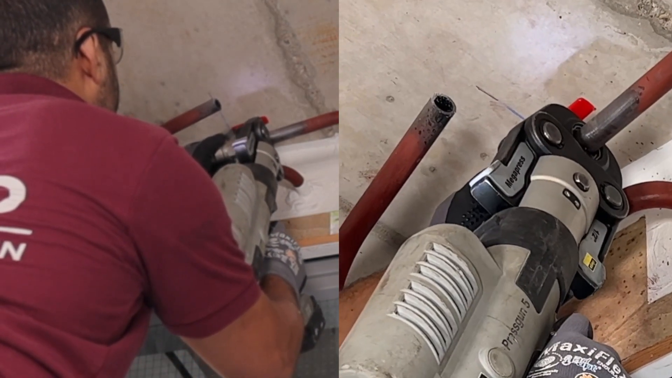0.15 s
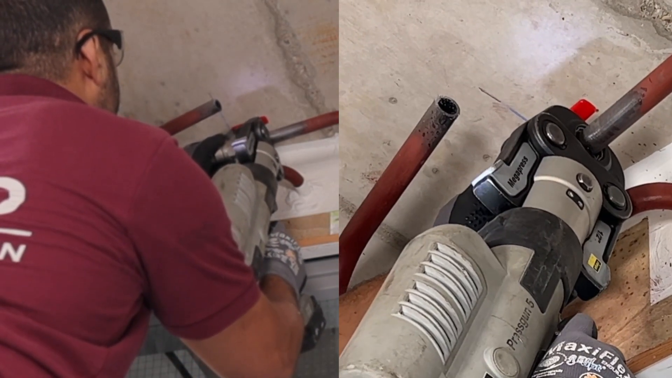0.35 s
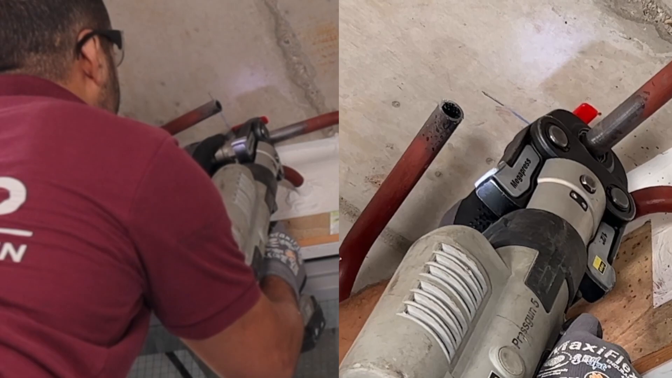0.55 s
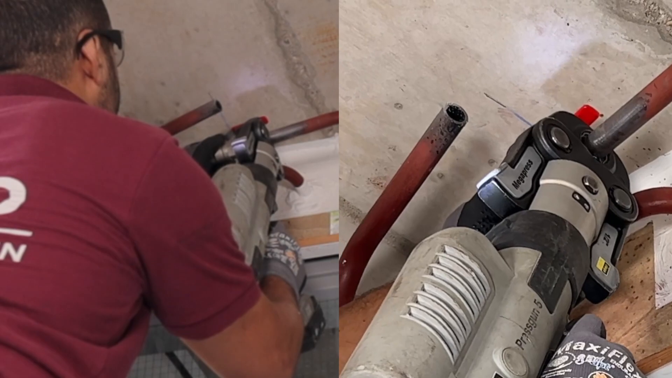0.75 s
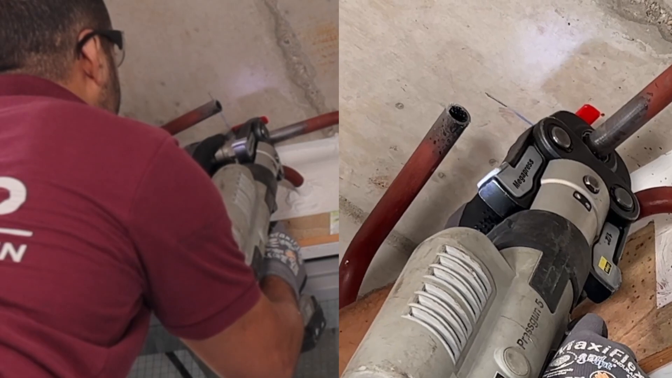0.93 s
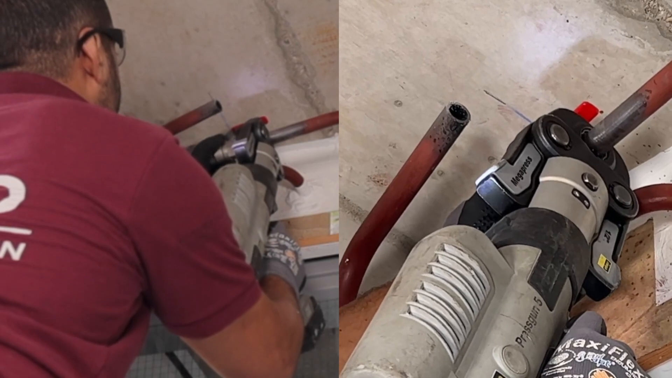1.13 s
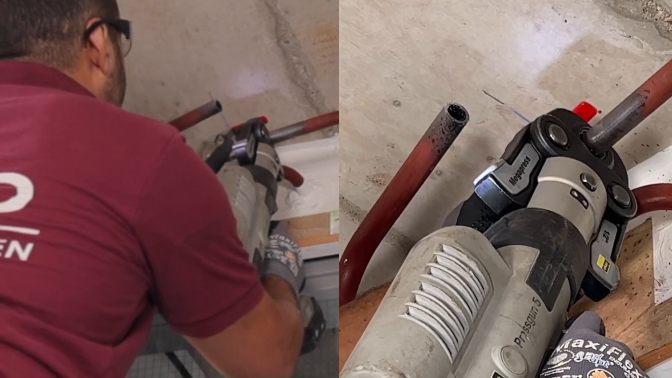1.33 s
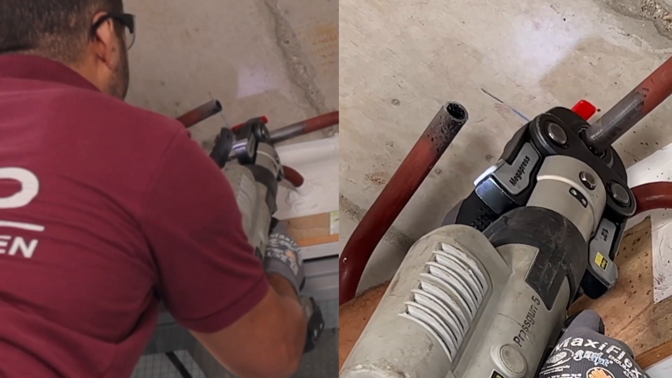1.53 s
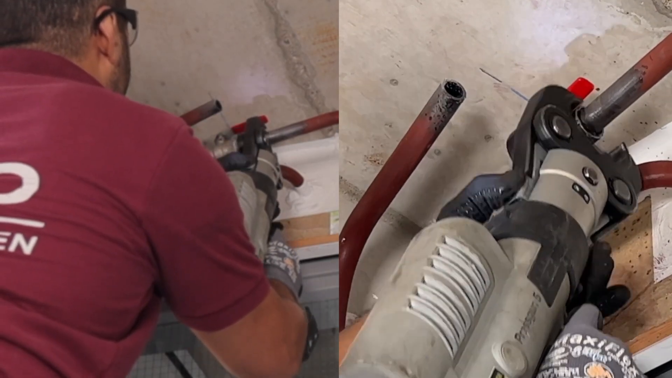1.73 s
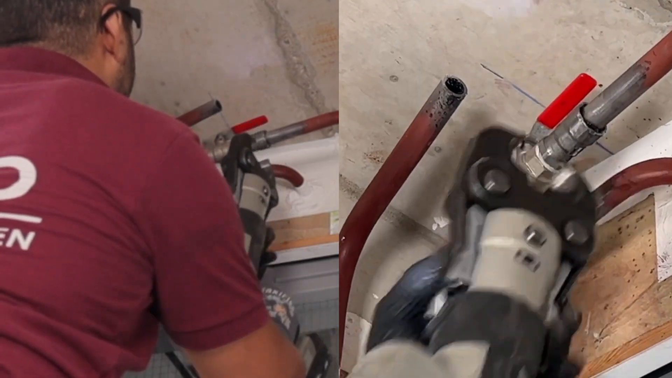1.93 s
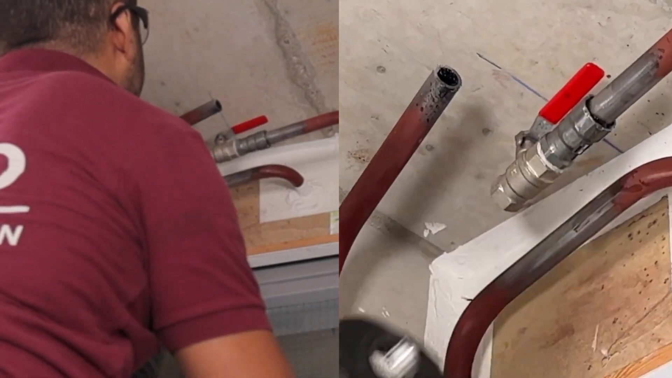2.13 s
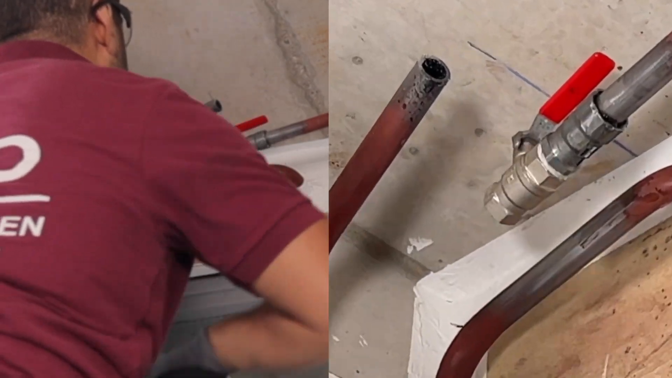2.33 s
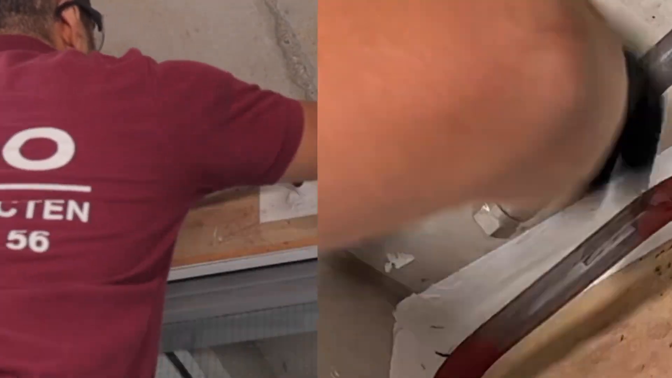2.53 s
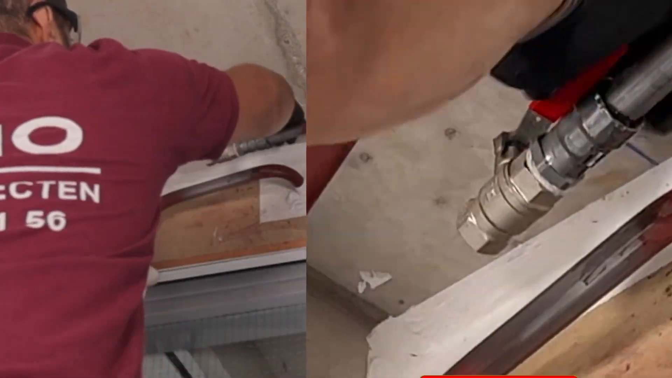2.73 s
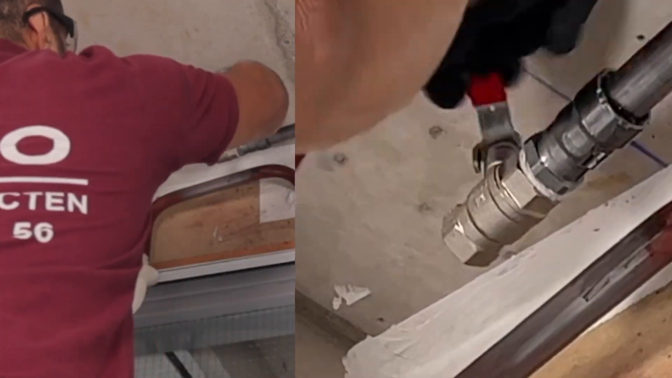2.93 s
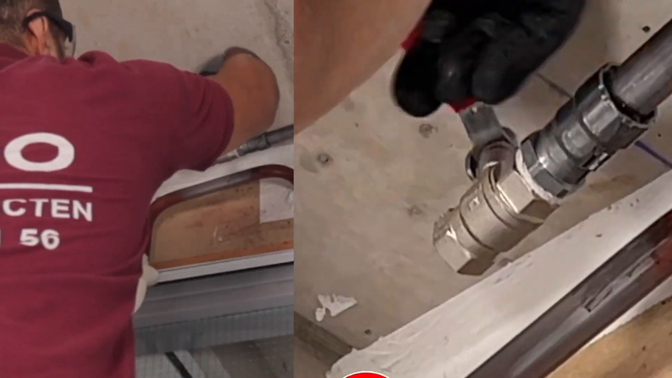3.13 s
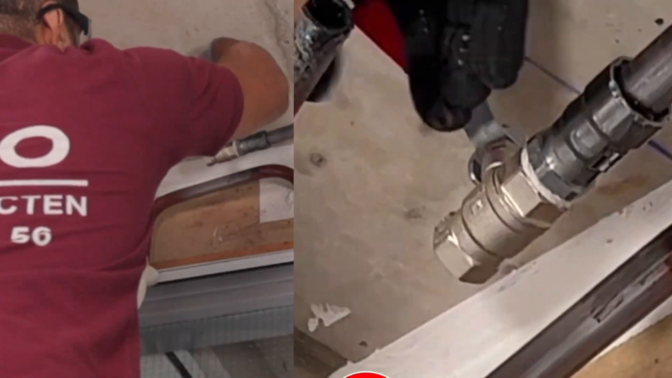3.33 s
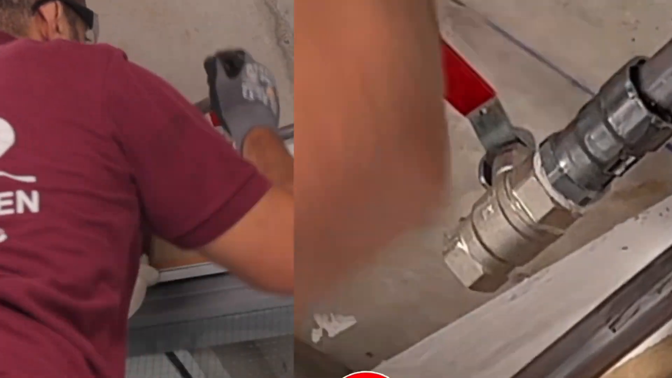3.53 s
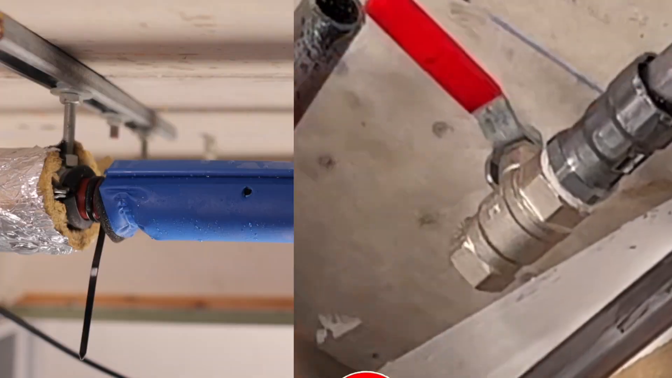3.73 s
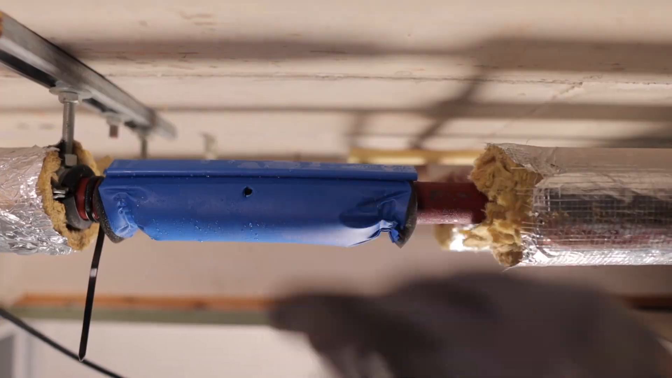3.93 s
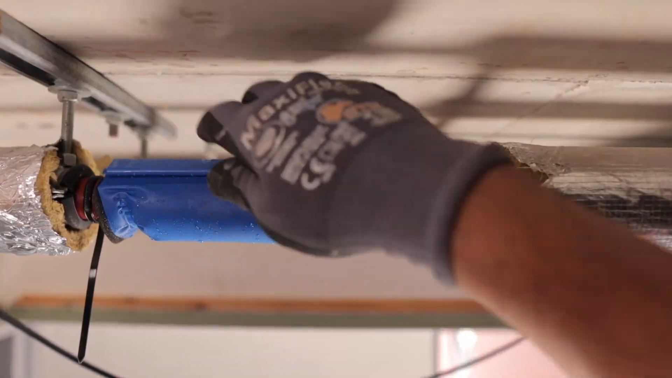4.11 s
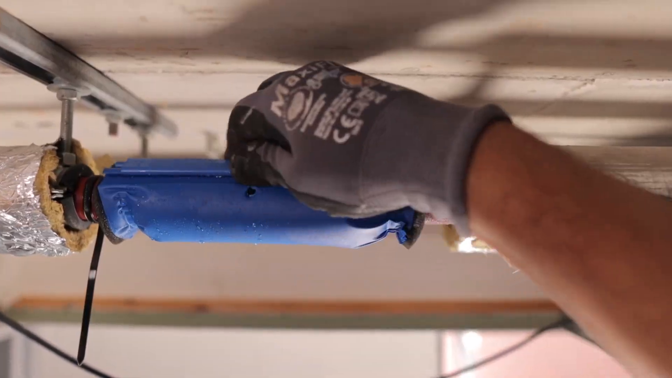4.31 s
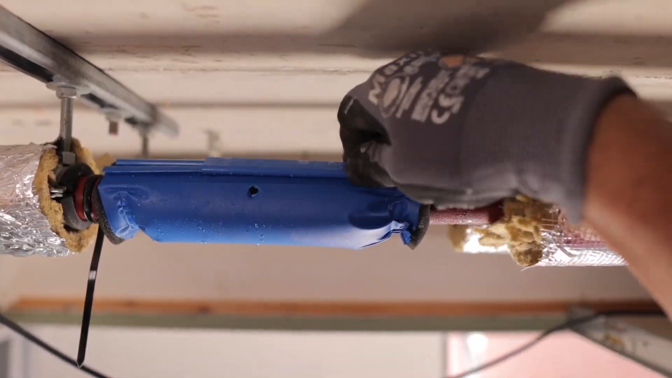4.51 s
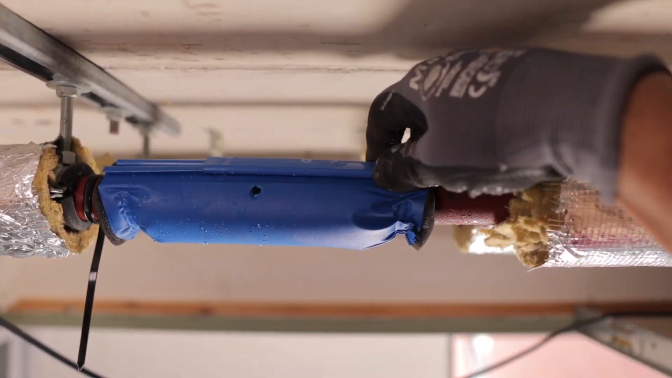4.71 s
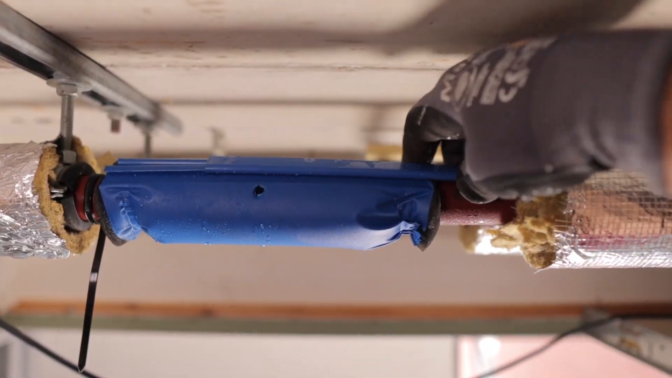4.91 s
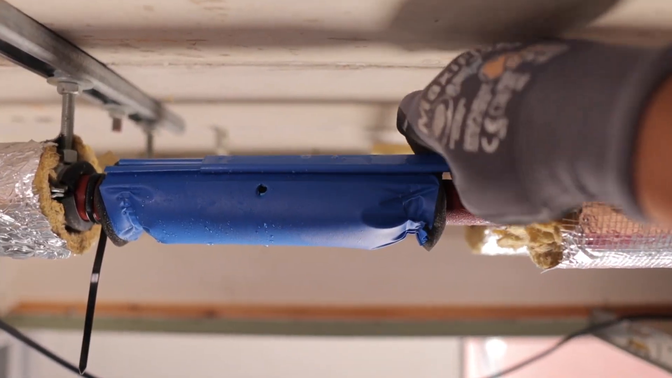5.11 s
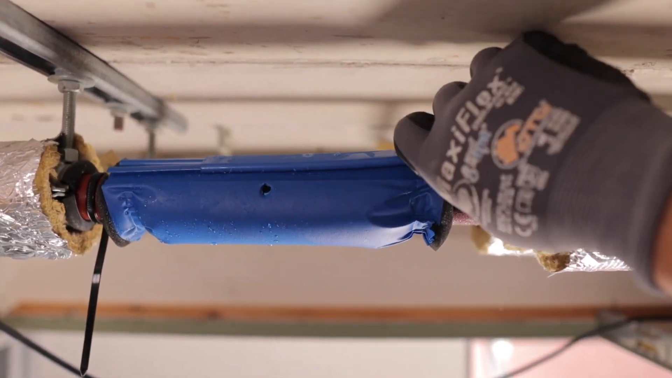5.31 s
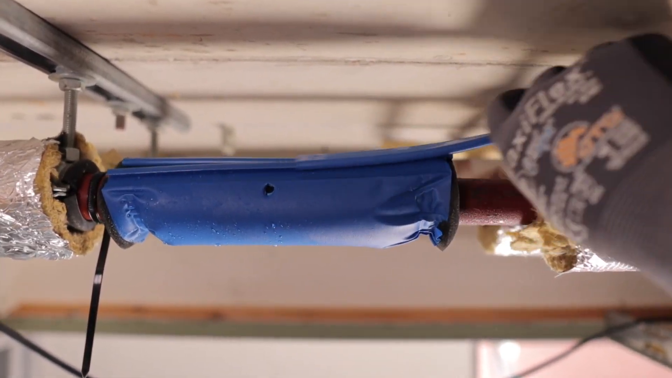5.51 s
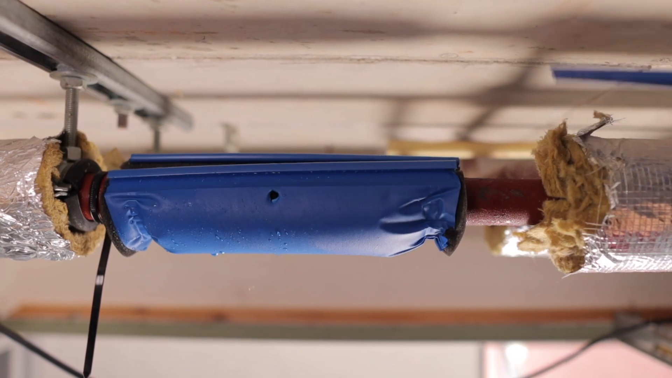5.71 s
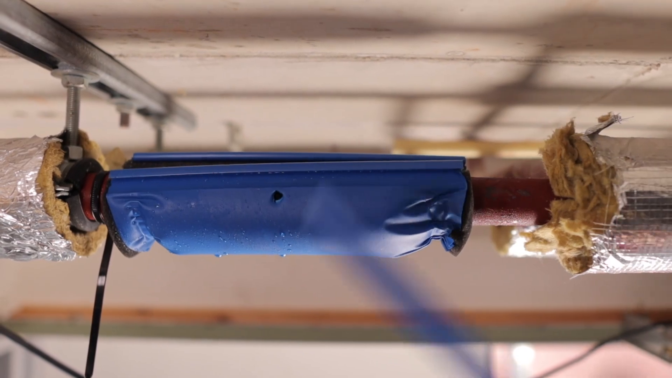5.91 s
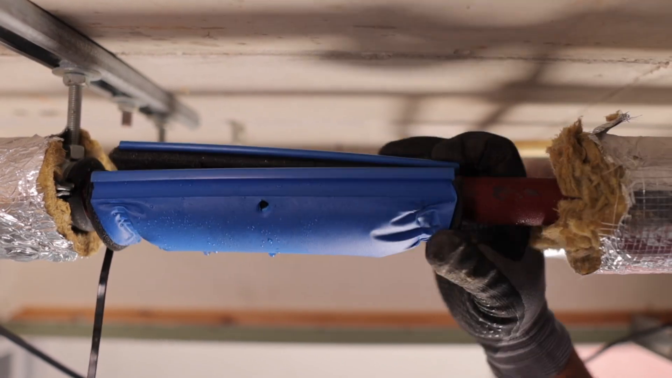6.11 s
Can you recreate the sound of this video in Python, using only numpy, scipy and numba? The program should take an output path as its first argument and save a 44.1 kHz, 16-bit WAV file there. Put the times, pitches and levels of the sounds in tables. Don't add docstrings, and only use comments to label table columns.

```python
import sys
import numpy as np
from scipy import signal
from scipy.fft import rfft, irfft
from scipy.io import wavfile
from scipy.ndimage import uniform_filter1d
from numba import njit

SR = 44100
rng = np.random.default_rng(int(sys.argv[2]) if len(sys.argv) > 2 else 0)


def undo_db(level):
    steps = np.asarray(level, float) / 20
    return 10 ** steps


def int16_out(signal):
    q = np.round(np.clip(np.atleast_2d(signal).T, -1, 1) * 32767)
    wavfile.write(sys.argv[1], SR, q.astype(np.int16))


N = 271656

# t/s, stroke f/Hz
CRIMP = [(0.0, 62.8), (0.192, 64.09), (0.34, 64.1), (0.46, 62.64), (0.59, 62.12), (0.762, 58.72),
         (0.908, 55.2), (0.976, 52.88), (1.019, 52.0)]
# multiple, level/dB
STROKE = [(1, -19.5), (2, -24.5), (3, -25), (4, -20), (5, -10.5), (6, -13)]
# multiple, level/dB
STEADY = [(9, -15), (10, -17), (12, -11.5), (15, -12), (16, -12.5), (17, -9.5), (29, -15), (31, -12),
          (35, -16), (40, -16), (41, -11.5), (91, -22)]
# multiple, level/dB
ODD = [(40, 5), (41, 2.5), (15, 8.5), (17, -0.5), (18, -2), (19, -6.5), (23, 6), (25, 7.5), (26, -1.5),
       (27, 3.5), (28, 4), (29, 1.5), (11, -6), (7, -2), (24, -3.5), (32, 4.5), (35, 3), (30, -9.5),
       (31, 11)]
# multiple of the stroke, level/dB
MESH = [(89.9, -5.5)]
# f/Hz, width/Hz, level/dB
HOUSING = [(764, 18, -8), (1076, 60, 1.5), (1960, 130, -3.5), (2178, 11, 3.5), (2590, 90, -7.5),
           (2930, 170, -8), (3500, 89, -12), (440, 37, -11), (1500, 160, -9.5), (4350, 37, -10.5),
           (5220, 300, -6.5)]
# f/Hz, level/dB per Hz
TOOL = [(88, -64.5), (150, -27), (303, -7), (745, 6), (871, -12), (1060, -6.5), (1260, -7.5), (2020, -7),
        (4670, -6), (5680, -8), (6140, -4), (12400, -16), (16000, -35.5)]
# t/s, f/Hz, level/dB, length/s
DUMP = [
    (1.0192, 430, -6, .0085),
    (1.0200, 1350, -9, .0055),
    (1.0185, 200, -24, .011),
]
# t/s, peak level/dB, low ring level/dB, high ring level/dB, free ringing/s
JAWS = [
    (1.8620, -9, -45, -45, .004),
    (1.8632, -1, -45, -16, .006),
    (2.1098, -5, -12, 1, .0093),
    (2.1160, -20, -3, 3, .011),
    (2.1300, -8, 1, -11, .0075),
    (2.1302, -30, 14, 2, .019),
    (2.1398, -11, -6, -6, .004),
    (2.1452, -12, -7, -10, .004),
    (2.1490, -17, -18, -12, .004),
]
# f/Hz, width/Hz, level/dB
JAW_MODES = [(716, 230, -4.5), (1700, 1500, 2), (2240, 390, -10), (3570, 590, 1), (4500, 600, -8.5),
             (6100, 670, 0), (10940, 600, -15.5), (12600, 1800, -11.5)]
# f/Hz, t60/s
FREE_RINGS = [(8220, .2), (13870, .15)]
# f/Hz, level/dB, t60/s
GRIP_RINGS = [(3370, -13.5, .85), (4430, -10.5, .5), (4470, -12.5, .5), (5335, -15, .46), (6196, -7.5, .4),
              (6460, -7.5, .4), (6800, -10, .45), (8140, -3.5, .5), (8330, -3.5, 0.6), (12670, -17, .35),
              (13790, -6, .35), (13900, -4, .3), (14010, -7, .35), (1100, -10, .4), (2300, -9.5, .4)]
# f/Hz, width/Hz, level/dB
SHIVER = [(5950, 300, 0), (7040, 300, -1), (8830, 120, -9), (12600, 420, -7), (13800, 260, -7)]
# t/s, peak
# level/dB, body f/Hz, treble level/dB, t60/s
THUMPS = [(1.8632, 1, 6310, -38.5, 0.022), (1.8622, -6.5, 727, -40.5, 0.044),
          (1.8645, -7.5, 1900, -30, 0.013), (1.8858, -26, 1500, -16, .015), (1.8975, -26.5, 1204, -12, .02),
          (1.8990, -19, 656, -19.5, 0.033), (2.1310, -5, 6640, -39.5, 0.035),
          (2.1098, -5.5, 1500, -12, 0.017), (2.11, -7, 3300, -30, .018), (2.1102, -16, 750, -30, .013),
          (2.113, -18.5, 1400, -40, .06), (2.1302, -5.5, 1500, -20, .013), (3.034, -39.5, 855, -4, .03),
          (3.463, -31, 135, -59, .14), (3.049, -35, 2150, -13.5, .035)]
# t/s, peak level/dB, body f/Hz, treble level/dB
KNOCKS = [(1.314, -35, 676, -24), (1.4885, -32.5, 1370, 0), (1.4895, -35.5, 5230, -18),
          (1.637, -40, 730, -27.5), (1.734, -44.5, 630, -5), (1.812, -35.5, 1200, -11),
          (1.8195, -23.5, 700, -10), (1.821, -39.5, 1500, 13), (2.339, -35, 834, -8),
          (2.364, -32.5, 700, -18), (2.469, -29, 720, -14.5), (2.472, -34, 450, -40),
          (2.793, -53, 650, 10.5), (3.337, -44, 463, -25.5), (2.089, -34.5, 900, -39.5),
          (3.800, -44, 426, -2)]
# t/s, peak level/dB
SLIPS = [(3.4324, -14), (3.4429, -20), (3.4462, -15), (3.4572, -13.5), (3.4655, -22), (3.471, -21),
         (3.4786, -15), (3.4863, -17), (3.437, -28.5), (3.494, -21), (3.689, -23), (3.705, -23)]
# f/Hz, width/Hz, level/dB
LEVER_MODES = [(133, 30, -7), (443, 60, -15), (396, 114, -12), (655, 80, -5), (745, 81, -6),
               (930, 87, -7.5), (1530, 170, -8.5), (1780, 89, -6.5), (2540, 80, -18), (2850, 70, -27),
               (3700, 60, -30), (4050, 90, -26)]
# t/s, f ratio
BEND = [
    (3.43, .97),
    (3.51, 1.04),
    (3.6, 1.0),
    (3.81, .92),
]
# peak
# t/s, rise/s, fall/s, rub level/dB, swish level/dB over the rub
MOVES = [(1.37, 0.13, 0.44, -44.5, -13), (1.869, 0.084, 0.15, -33, -20), (1.97, 0.084, 0.13, -60.5, 14),
         (2.18, 0.033, 0.4, -65, 27), (2.344, .12, 0.23, -47.5, -13.5), (2.75, 0.33, 0.14, -59, 0.5),
         (3.044, 0.028, 0.2, -39.5, -9), (3.1, 0.06, 0.21, -36, -18), (3.48, 0.026, 0.15, -29, -25),
         (3.62, 0.09, 0.19, -37, -15), (3.744, 0.5, 0.042, -34.5, -14), (3.28, 0.17, 0.15, -47.5, -10),
         (3.13, .08, 0.081, -52, -17)]
# f/Hz, level/dB per Hz
RUB = [(120, -22), (200, -6), (290, -1.5), (602, -2), (720, -3), (1220, -7), (1790, -8), (2300, -11.5),
       (3500, -22.5), (4550, -50), (7700, -120)]
# f/Hz, level/dB per Hz
SWISH = [(1180, -31), (2000, 1), (2530, 0.5), (3310, 3.5), (4990, 2), (13600, -12), (16000, -25)]
# peak t/s, rise/s, fall/s, level/dB
DRAG = [
    (3.10, 0.046, 0.19, -38.5),
    (3.17, 0.09, .2, -38),
    (3.225, 0.13, 0.043, -42.5),
    (3.33, 0.097, 0.18, -48.5),
]
# f/Hz, width/Hz, level/dB
BENCH_MODES = [(118, 30, 1), (205.2, 36, 2), (257.3, 32, -2), (323.7, 40, -4), (460, 40, -1.5),
               (721, 35, -5.5), (1040, 40, -10.5)]
# peak t/s, rise/s, fall/s, level/dB
THUDS = [
    (1.101, .05, 0.56, -48),
    (1.868, 0.14, 0.82, -46),
    (2.344, .3, 0.18, -57),
    (3.0, 0.35, 0.042, -55),
    (3.15, 0.19, 0.68, -42.5),
    (3.46, 0.13, .2, -53.5),
    (3.62, 0.36, 0.45, -48),
]
# f/Hz, level/dB per Hz
RUMBLE = [(12, -33.5), (20, -13.5), (60, 14.5), (96, 5.5), (128, 5), (166, -5.5), (198, -3), (255, -2.5),
          (289, -14.5), (400, -1.5), (520, -28.5), (880, -120)]
# t/s, peak level/dB, body f/Hz, treble level/dB, t60/s
SNAPS = [(3.825, -20, 2550, -10, 0.038), (3.915, -22.5, 3370, -18.5, 0.037),
         (4.241, -21, 3080, -22.5, 0.037), (4.403, -20.5, 2180, -11, 0.026),
         (4.4522, -19, 2490, -0.5, 0.022), (4.514, -32.5, 1345, -27, 0.049), (4.68, -36, 2410, 8.5, 0.05),
         (4.702, -37.5, 1240, -15.5, 0.0305), (4.783, -41.5, 1226, -21, 0.027),
         (4.831, -38, 2540, 2.5, 0.027), (4.8503, -38.5, 2060, 11.5, 0.028),
         (4.869, -37, 2050, -26, 0.0293), (4.961, -43.5, 1960, 1, 0.022), (5.1, -40.5, 1595, 4, 0.051),
         (5.1947, -24.5, 2320, 2.5, 0.034), (5.229, -37, 1380, -8, 0.022), (5.3214, -29, 5420, -4, 0.023),
         (5.349, -18.5, 1590, -0.5, 0.066), (5.7505, -22, 1684, -2, 0.033), (5.874, -27, 2140, -6, 0.013),
         (4.2362, -29, 4780, -1, 0.12), (5.1715, -31.5, 2310, -8, 0.16), (6.0235, -31, 3020, -10, 0.045)]
# t/s, peak level/dB, body f/Hz, treble level/dB, t60/s
SCUFFS = [(4.155, -29.5, 1175, -3.5, 0.12), (4.269, -32.5, 1760, 1, 0.13), (4.582, -35, 1460, -31, 0.037),
          (4.935, -38.5, 1320, -21, 0.13), (5.006, -34, 1460, -29, 0.09), (5.063, -36, 1143, -23.5, 0.037),
          (5.17, -30.5, 564, -4, 0.14), (5.324, -25.5, 630, -7.5, 0.15), (5.384, -39, 793, -17, 0.058),
          (5.591, -38.5, 1180, -16.5, 0.048), (5.834, -36.5, 593, -13, 0.0893),
          (6.025, -28, 1340, -1.5, 0.097)]
# t/s, peak level/dB, f/Hz, t60/s
PINGS = [(4.157, -33, 1156, 0.075), (4.2374, -21, 5090, 0.05), (4.238, -20.5, 3270, .025),
         (4.4032, -25.5, 2330, .015), (4.4525, -18, 2440, 0.01), (4.5157, -32.5, 1403, .04),
         (4.5828, -32, 1530, 0.032), (4.739, -45, 1060, 0.032), (4.8503, -26.5, 5640, 0.011),
         (4.9407, -40, 1500, .02), (4.9615, -38, 5760, .015), (5.0076, -42, 4900, .015),
         (5.028, -45, 3010, .01), (5.139, -47, 2500, .01), (5.1772, -34.5, 703, 0.024),
         (5.196, -21, 5760, 0.012), (5.197, -24, 7700, 0.014), (5.196, -26, 4500, .015),
         (5.322, -31, 3700, 0.023), (5.336, -33, 560, .03), (5.3500, -26, 637, 0.031),
         (5.3498, -30, 5140, .02), (5.386, -39, 900, 0.026), (5.425, -40, 650, 0.04),
         (5.593, -43, 1190, 0.054), (5.660, -34, 1080, .03), (5.7165, -33, 1780, .04),
         (5.728, -32, 4250, .015), (5.733, -32, 1740, 0.034), (5.742, -29, 2300, .02),
         (5.7522, -18.5, 1700, 0.027), (5.7518, -24.5, 580, 0.013), (5.780, -38, 1740, .04),
         (5.8457, -37, 3200, .015), (5.875, -24, 5800, 0.0063), (5.1962, -25, 13200, 0.014),
         (5.175, -32, 12300, 0.0089), (5.3235, -34, 13000, .012), (5.353, -31, 13080, .015),
         (6.024, -30, 11500, 0.013), (6.0083, -39, 1320, 0.043), (6.028, -30, 1215, 0.025),
         (6.125, -40.5, 1195, .03)]
# peak t/s, rise/s, fall/s, rub level/dB, crinkle level/dB over the rub
PULLS = [(3.939, 0.22, 0.037, -68.5, 9), (4.26, 0.036, 0.1, -52.5, 6), (4.2, 0.12, 0.28, -56, -10),
         (4.43, 0.25, 0.19, -48.5, -14), (4.6, 0.14, 0.073, -48, -11.5), (5.01, 0.23, 0.23, -54.5, -7.5),
         (5.369, 0.058, 0.11, -49.5, -12), (5.665, 0.036, 0.038, -46.5, -7),
         (5.747, 0.075, 0.042, -39.5, -6), (5.70, 0.22, 0.12, -45.5, -12.5),
         (5.85, 0.025, 0.063, -44.5, -3), (5.9, .08, 0.14, -56.5, -2), (6.041, 0.2, 0.18, -56.5, -10),
         (6.16, 0.18, .1, -53, -11)]
# f/Hz, level/dB per Hz
SLEEVE = [(120, -12), (200, -7.5), (616, 4.5), (747, 1.5), (1390, 0), (1730, -4), (2070, -5), (3500, -37),
          (4550, -35), (7700, -120)]
# f/Hz, level/dB per Hz
STRIP = [(1180, -4.5), (2000, -2.5), (2910, -4.5), (3460, -7.5), (4340, -9.5), (5160, -5), (8630, -17.5),
         (13700, -21), (14700, -32), (16000, -31)]
# t/s, f/Hz, width/Hz, level/dB, half length/s
SQUEAK = (5.95, 5800, 260, -54, .022)
# f/Hz, level/dB per Hz
QUIET = [(12, -39), (20, -14), (59, -4.5), (189, -16.5), (225, -21.5), (305, -23.5), (900, -35),
         (1170, -39), (1980, -120)]
# f/Hz, t60/s
ROOM_T60 = [(300, 0.74), (1200, 0.72), (4000, 0.98), (11000, 0.6)]

LAST_KNOCK_S, FREED_S, BRAKE_S, CUT_S = 1.0140, 1.024, 1.099, 3.808
FREE_HZ, BRAKE_HZ_PER_S, CRAWL_HZ = 65.4, 620, 31
LOADED_DB, STRAIN_DB, FREED_DB, FADE_DB_PER_S, FADE_LAG_S = -17.5, 2, -25.5, 480.5, 0.02
WHINE_DB, SINGS_HZ, SINGS_WIDTH_HZ, SINGS_DB = -12, 61.26, 3.7, 9.5
HISS_DB, FREED_HISS_DB = -18, -13.5
LOOSE_DB = 2
CREEP = 5
GRIP_S, GRIP_DB = 2.112, -33
OPENED_S, OPENED_DB, OPENED_T60_S = 1.866, -40, .55
CRACK_T60_S, KNOCK_T60_S = 0.027, 0.021
STILL_RUB_DB, STILL_SWISH_DB, STILL_RUMBLE_DB = -58, -71.5, -59
HELD_RUB_DB, HELD_CRINKLE_DB = -62.5, -75.5


def press():
    n = int(1.3 * SR)
    hz, db, whine_db, hiss_db = motor()
    hz = hz[:n]
    dumped = np.arange(n) >= DUMP[0][0] * SR
    pressure = np.clip((64.5 - hz) / 13.0, 0, 1) * ~dumped
    turn = np.cumsum(hz) / SR
    turn -= turn[int(LAST_KNOCK_S * SR)]
    phase = 2 * np.pi * turn
    pattern = 1 - 1.2 * np.maximum(pressure, dumped)

    loose = rng.standard_normal(n) * undo_db(1.4 * np.cos(2 * phase) + 1.1 * walk(150, n))
    drive = level(clatter(phase, pattern), 0) + level(loose, LOOSE_DB)
    body = drive + sum(3.7 * undo_db(d) * band(drive, f, 1.9 * w) for f, w, d in HOUSING)
    body = signal.lfilter(*signal.butter(2, 330, "high", fs=SR), colour(body, TOOL))
    body = level(body, 0) * undo_db(-7.0 * pressure * (turn % 1 + 0.06))
    shell = level(band(band(drive, 3700, 90), 3700, 130), -11) * np.exp(-((hz - 61.7) / 1.5) ** 2)

    strokes = sum(undo_db(d) * np.sin(k * phase + k * k) for k, d in STROKE)
    steady = pattern ** 2 * sum(undo_db(d + 2.0 * walk(14, n)) * np.sin(k * phase + 0.6 * walk(25, n))
                                for k, d in STEADY)
    wobble = 1 + .45 * np.sin(phase) + .2 * walk(60, n)
    whine = wobble * sum(undo_db(d) * np.sin(k * phase + (1.1 + 3.2 * pressure) * walk(140, n)) for k, d in MESH)

    click = np.diff(np.floor(turn), prepend=np.floor(turn[0]))
    burst = rng.standard_normal(n) * np.exp(-(turn % 1) / hz / 0.0075) + 6.8 * click
    knock = band(burst, 2800, 1600) + .4 * band(burst, 6000, 1500) + 0.3 * band(burst, 12500, 6000)
    rough = burst + .5 * loose
    grind = band(band(rough, 1700, 600), 1700, 900) + .8 * band(band(rough, 3100, 700), 3100, 1200)
    brushes = band(band(rng.standard_normal(n), 6300, 8300), 6600, 9800) * undo_db(0.5 * walk(200, n))

    mix = body + steady + shell
    mix += undo_db(-5) * pressure ** 2 * level(grind, 0)
    mix += undo_db(-10.5) * strokes + undo_db(whine_db[:n]) * whine
    mix += undo_db(-4.5) * piston_slap(turn)
    mix += undo_db(-27.5 + 13 * pressure) * level(knock, 0)
    mix += undo_db(hiss_db[:n] - 3.0) * level(brushes, 0)
    out = np.zeros(N)
    out[:n] = mix
    out *= undo_db(db)
    for s, f, d, length in DUMP:
        t = np.arange(int(length * SR)) / SR
        add(out, s, undo_db(d) * np.sin(2 * np.pi * f * t) * np.sin(np.pi * t / length) ** .5)
    return out


def clatter(phase, pattern):
    n = len(phase)
    creep = np.array([np.cumsum(walk(30, n)) / SR for _ in range(4)])
    patchy = np.gradient(creep, axis=1) * SR
    mixes = rng.standard_normal((110, 5))
    uneven_db = 3.2 * mixes[:, 0] * (np.arange(110) > 32)
    for k, d in ODD:
        uneven_db[round(k) - 1] = d
    out = np.zeros(n)
    for k in range(7, 111):
        m = mixes[k - 1]
        gain = undo_db(pattern * uneven_db[k - 1] + 4.3 * np.tanh(m[:4] @ patchy / 2)) / (1 + (k / 80) ** 6)
        drift = 9 * m[4] + CREEP * np.sqrt(k / 10) * (m[:4] @ creep)
        out += gain * np.sin(k * phase + drift)
    return out


def piston_slap(turn):
    ends = np.floor(2 * turn + .14)
    slap = np.diff(ends, prepend=ends[0]) * undo_db(2.2 * walk(150, len(turn)) - 4.4 * (ends % 2))
    ring = band(band(slap, 2000, 590), 2000, 760) - 0.45 * band(slap, 730, 340)
    return level(ring - .3 * band(band(slap, 2700, 670), 2700, 1200), 0)


def motor():
    t = np.arange(N) / SR
    s, hz = np.transpose(CRIMP)
    hz = np.interp(t, [*s, FREED_S, BRAKE_S], [*hz, hz[-1] + 1, FREE_HZ])
    hz = np.maximum(hz - BRAKE_HZ_PER_S * np.clip(t - BRAKE_S, 0, None), CRAWL_HZ)
    freed = np.clip((t - DUMP[0][0]) / 0.026, 0, 1)
    db = (1 - freed) * (LOADED_DB + STRAIN_DB * t ** 4) + freed * FREED_DB
    db -= FADE_DB_PER_S * np.clip(t - BRAKE_S - FADE_LAG_S, 0, 1)
    whine_db = WHINE_DB + SINGS_DB * np.exp(-((hz - SINGS_HZ) / SINGS_WIDTH_HZ) ** 2) + 7.3 * freed
    whine_db -= 4.6 * np.clip(56.5 - hz, 0, 12) * freed + 400 * np.clip(t - BRAKE_S, 0, .1)
    return hz, db, whine_db, HISS_DB + freed * (FREED_HISS_DB - HISS_DB)


def jaws():
    out, t = np.zeros(N), np.arange(int(.7 * SR)) / SR
    n = len(t)
    for (s, db, low_db, high_db, free), luck in zip(JAWS, rng.standard_normal((len(JAWS), 8))):
        crack = rng.standard_normal(n) * undo_db(-60 * t / CRACK_T60_S) * np.clip(t / 0.00014, 0, 1)
        hit = 0.092 * crack
        hit += sum(undo_db(d + g) * 6.8 * band(crack, f, w) for (f, w, d), g in zip(JAW_MODES, luck))
        hit /= 2.2 * hit[:200].std()
        choke = np.exp(-(t / free) ** 6) * np.clip(t / .0006, 0, 1)
        for (f, t60), d in zip(FREE_RINGS, (low_db, high_db)):
            decay = undo_db(0.72 * walk(340, n) - 60 * t / t60)
            hit += undo_db(d) * choke * np.sin(2 * np.pi * f * (s + t)) * decay
        add(out, s, undo_db(db) * hit)
    grip = np.zeros(n)
    for f, d, t60 in GRIP_RINGS:
        grip += undo_db(d + 3.5 * walk(120, n) - 60 * t / t60) * np.sin(2 * np.pi * f * t + 2.0 * walk(110, n))
    add(out, GRIP_S, undo_db(GRIP_DB) * grip * np.clip(t / 0.042, 0, 1))
    shiver = sum(undo_db(d) * level(band(band(rng.standard_normal(n), f, w), f, 2 * w), 0) for f, w, d in SHIVER)
    add(out, OPENED_S, undo_db(OPENED_DB - 60 * t / OPENED_T60_S) * shiver * np.clip(t / .01, 0, 1))
    return out + taps(THUMPS, 6.1, 3800, 0.00018, 0.35, .05)


def taps(table, sharpness, edge_hz, rise, snap, air):
    out, t = np.zeros(N), np.arange(int(.25 * SR)) / SR
    for s, db, hz, treble_db, t60 in table:
        decay = undo_db(-60 * t / t60) + snap * np.exp(-t / 0.00083)
        push = rng.standard_normal(len(t)) * decay * np.clip(t / rise, 0, 1)
        push[3] += 1.5 * snap
        wide = band(push, hz, 3.3 * hz)
        body = band(wide, hz, hz / sharpness) + 0.085 * wide
        edge = band(band(push, edge_hz, 1.4 * edge_hz), edge_hz, 1.2 * edge_hz)
        edge += air * band(push, 12600, 5000)
        hit = body / np.abs(body).max() + undo_db(treble_db + 0.5) * edge / np.abs(edge).max()
        add(out, s, undo_db(db) * hit)
    return out


def lever(rub):
    push, out = np.zeros(N), rub.copy()
    for s, db in SLIPS:
        add(push, s, undo_db(db + 24.5) * np.array([1., .6, -.3]))
    turning = slice(int(BEND[0][0] * SR), int((CUT_S + .01) * SR))
    push, rub = push[turning], rub[turning]
    bend = np.interp(np.arange(N)[turning] / SR, *np.transpose(BEND))
    ring = 0.77 * rub
    for k, (f, w, d) in enumerate(LEVER_MODES):
        force = push + 2.0 * rub * undo_db(3.4 * walk(22, len(rub)))
        ring += (-1) ** k * undo_db(0.81 * d) * gliding(force, f * bend, 0.73 * w, SR)
    out[turning] = ring
    return out


@njit
def gliding(x, hz, width, sr):
    y, b, l = np.empty(len(x)), 0., 0.
    for i in range(len(x)):
        g, k = np.tan(np.pi * hz[i] / sr), width / hz[i]
        v = (b + g * (x[i] + 1e-18 - l)) / (1 + g * (g + k))
        b, l, y[i] = 2 * v - b, l + 2 * g * v, k * v
    return y


def pings():
    out, t = np.zeros(N), np.arange(int(.1 * SR)) / SR
    for (s, db, hz, t60), (a, b) in zip(PINGS, rng.random((len(PINGS), 2))):
        pair = np.sin(2 * np.pi * hz * t) + .5 * np.sin(2 * np.pi * (hz * (1.04 + 0.088 * a) * t + b))
        add(out, s, undo_db(db - 2.0 - 60 * t / t60) * pair * np.clip(t / 0.00027, 0, 1))
    return out


def squeak():
    s, hz, width, db, half = SQUEAK
    tone = level(band(band(rng.standard_normal(N), hz, width), hz, width), db)
    return tone * np.exp(-((np.arange(N) / SR - s) / half) ** 2)


def friction(points, grain_db, flicker_db, rate):
    size = undo_db(grain_db * np.minimum(rng.exponential(size=N), 2)) * rng.standard_normal(N)
    grains = (rng.random(N) < rate / SR) * size
    rub = level(grains, 0) + 1.2 * rng.standard_normal(N)
    return level(colour(rub, points) * undo_db(flicker_db * walk(25)), 0)


def bench():
    grains = friction([(60, -2), (400, -2), (1500, -2.5), (3000, -31)], 4.4, 1.5, 400)
    modes = sum((-1) ** k * undo_db(d) * band(grains, f, w) for k, (f, w, d) in enumerate(BENCH_MODES))
    return level(modes, 0)


def swells(still_db, table, bright=False):
    t, power = np.arange(0, N / SR + .001, .001), undo_db(still_db) ** 2
    for s, rise, fall, db, *over_db in table:
        slope = np.maximum((s - t) / rise, (t - s) / fall)
        power = power + undo_db(db + bright * sum(over_db) - 20 * slope) ** 2
    return np.interp(np.arange(N) / SR, t, np.sqrt(power))


def room(x, db):
    t = np.arange(SR) / SR
    tail = np.zeros(SR)
    for hz, t60 in ROOM_T60:
        tail += band(band(rng.standard_normal(SR), hz, 1.6 * hz), hz, 1.6 * hz) * undo_db(-60 * t / t60)
    tail *= np.clip(t / .006, 0, 1)
    return undo_db(db) * signal.fftconvolve(x, tail / np.sqrt(np.sum(tail ** 2)))[:N]


def plant_room():
    t = np.arange(N) / SR
    near = press() + jaws() + taps([(*k, KNOCK_T60_S) for k in KNOCKS], 3.5, 3800, 0.0017, .4, .005)
    hands = swells(STILL_RUMBLE_DB, THUDS) * level(colour(rng.standard_normal(N), RUMBLE), 0)
    hands += lever(swells(STILL_RUB_DB, MOVES) * undo_db(-5.0) * friction(RUB, 2.3, 3.0, 2500))
    hands += swells(STILL_SWISH_DB, MOVES, bright=True) * friction(SWISH, 2.0, 1.7, 6000)
    hands += swells(-81, DRAG) * bench()
    hands *= np.clip((t - 1.1) / .005, 0, 1)
    under = level(colour(rng.standard_normal(N), RUMBLE), -56.0) * (t < 1.1)
    dull = signal.lfilter(*signal.butter(2, 12000, fs=SR), near)
    return near + room(dull, -18.5) + hands + under


def sleeve():
    near = taps(SNAPS, 1.9, 3900, .0001, 0.68, 0.3) + taps(SCUFFS, 1.2, 3840, 0.0044, 0, 0.029)
    near += swells(HELD_RUB_DB, PULLS) * undo_db(1.0) * friction(SLEEVE, 4.8, 0.21, 900)
    near += swells(HELD_CRINKLE_DB, PULLS, bright=True) * undo_db(10.0) * friction(STRIP, 4.5, 4.2, 4400)
    near += squeak()
    flicks = pings()
    near = undo_db(2.0) * (near + flicks)
    shadow = signal.lfilter(*signal.butter(1, 600, fs=SR), near)
    hum = level(colour(rng.standard_normal(N), QUIET), -64.5)
    hiss = undo_db(-61.5) * rng.standard_normal((2, N))
    left = undo_db(-9.0) * np.roll(shadow, shift=1) + room(shadow, -26.5) + undo_db(3.5) * hum
    right = near + room(near - flicks, -17.5) + hum
    return np.array([left, right]) + hiss


def level(x, db):
    return x * undo_db(db) / np.sqrt(np.mean(x ** 2))


def colour(x, points):
    hz, db = np.transpose(points)
    f = np.fft.rfftfreq(len(x), 1 / SR) + 1
    return irfft(rfft(x) * undo_db(np.interp(np.log(f), np.log(hz), db, -90, -90)), len(x))


def band(x, hz, width):
    return signal.lfilter(*signal.iirpeak(hz, hz / width, SR), x)


def walk(rate, length=N):
    k = int(SR / rate)
    held = np.repeat(rng.standard_normal(length // k + 1), k)
    return 1.1 * uniform_filter1d(held, k)[:length]


def add(out, s, x):
    i = int(s * SR)
    out[i:i + len(x)] += x[:N - i]


def scene():
    second = np.clip((np.arange(N) / SR - CUT_S) / 0.0035, 0, 1)
    return (1 - second) * plant_room() + second * sleeve()


def top_cut(x):
    return signal.sosfilt(signal.butter(12, 16260, fs=SR, output="sos"), x)


def record(dry):
    low_pass = signal.butter(14, 15200, fs=SR, output="sos")
    mix = signal.sosfilt(low_pass, np.clip(dry, -.9, .9))
    return top_cut(np.clip(mix, -1, 1))


dry = scene()
out = record(dry)
int16_out(out)
```